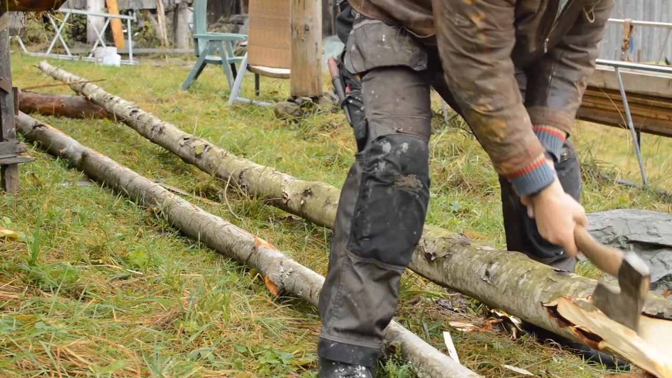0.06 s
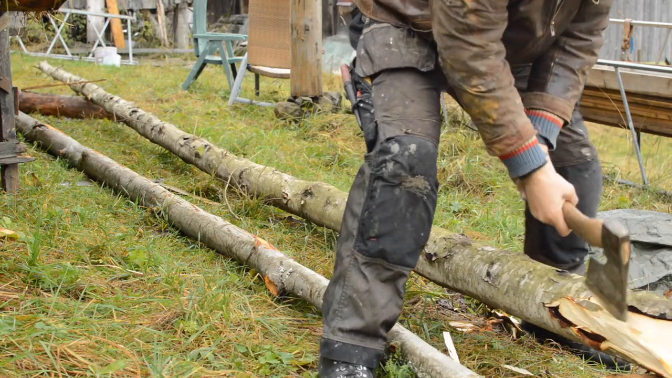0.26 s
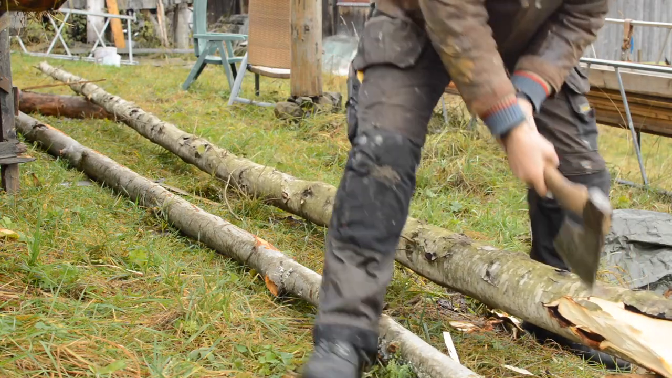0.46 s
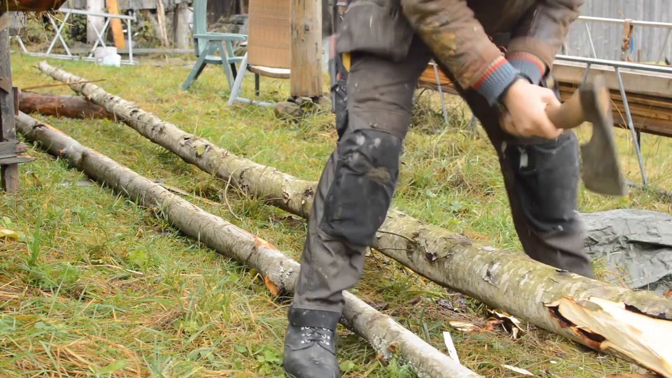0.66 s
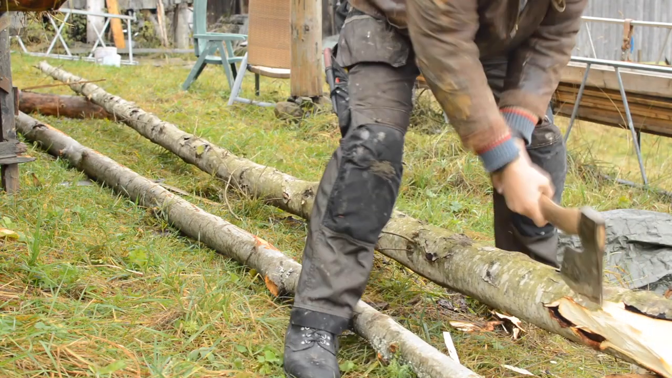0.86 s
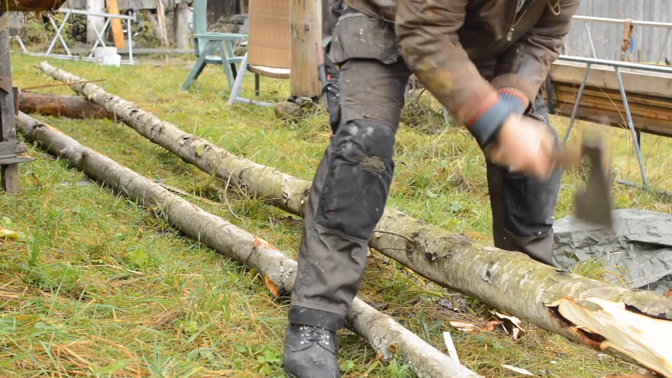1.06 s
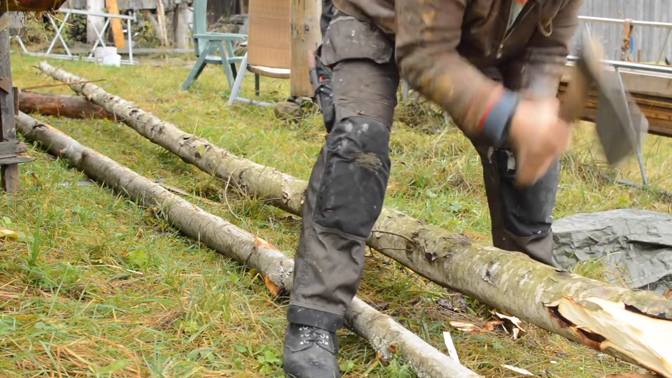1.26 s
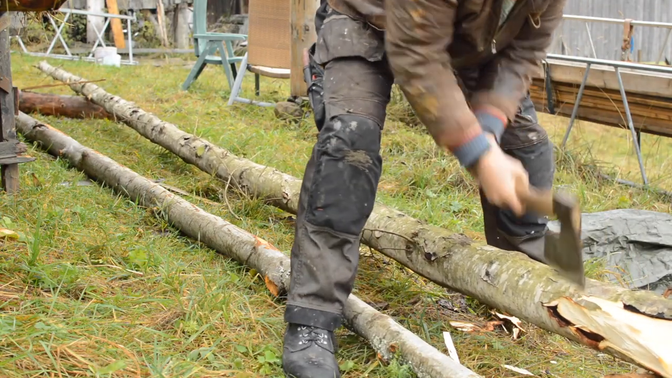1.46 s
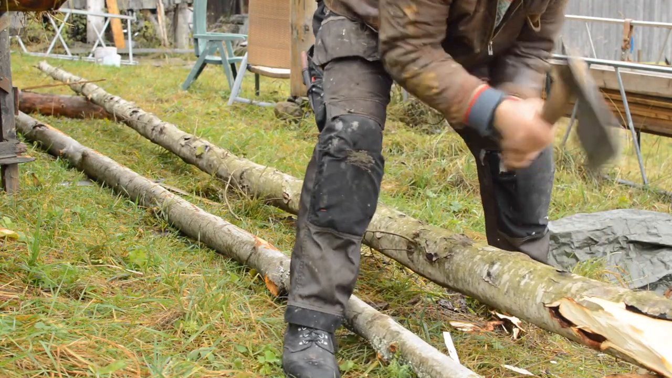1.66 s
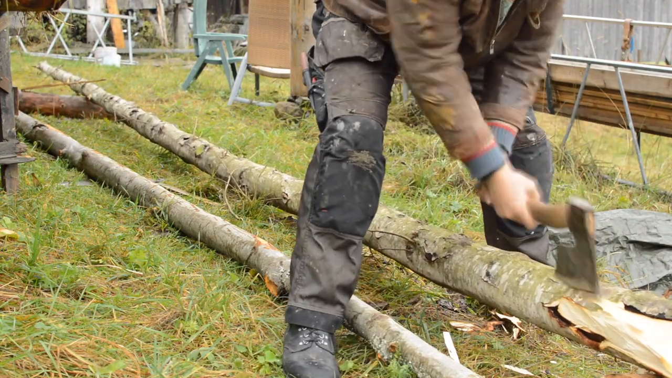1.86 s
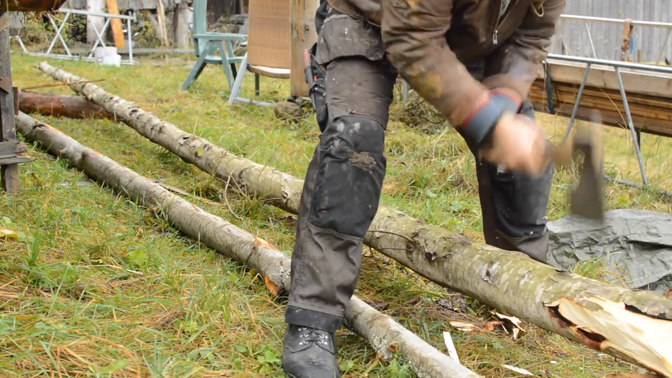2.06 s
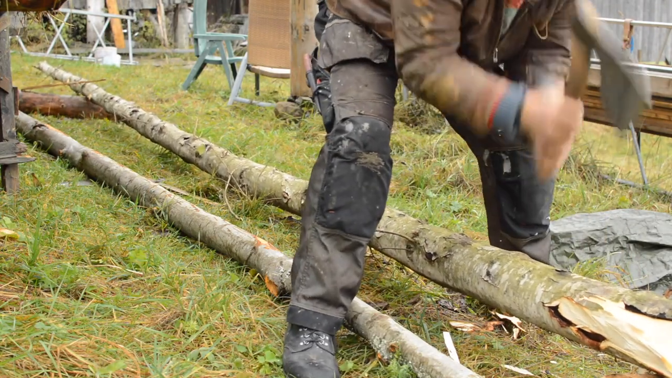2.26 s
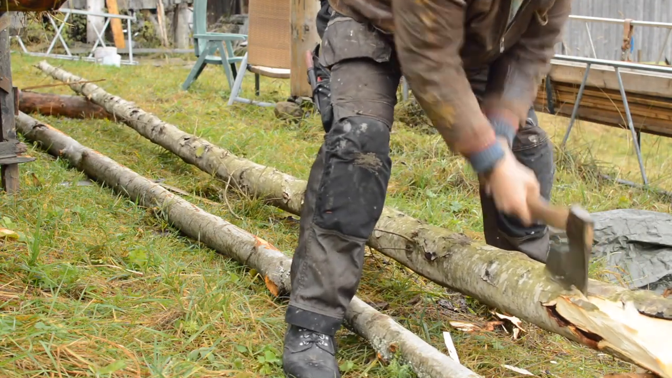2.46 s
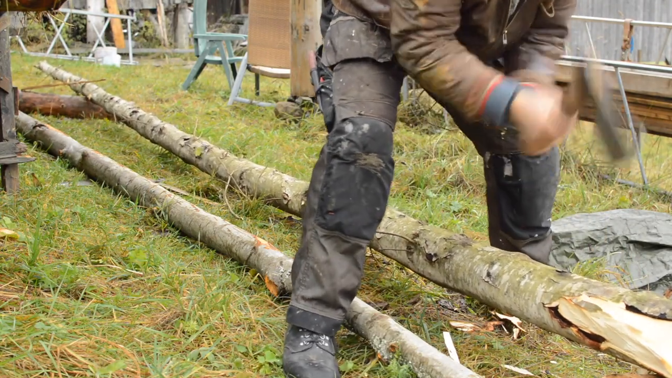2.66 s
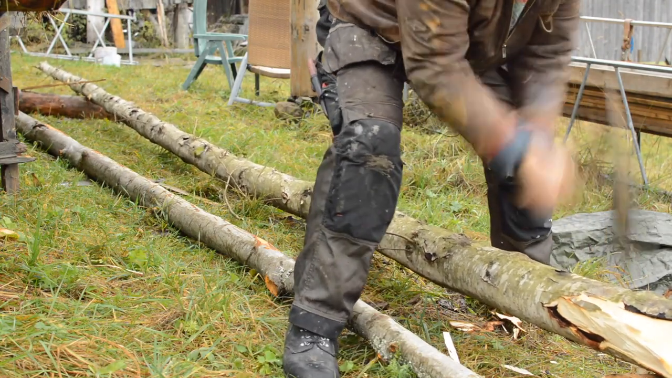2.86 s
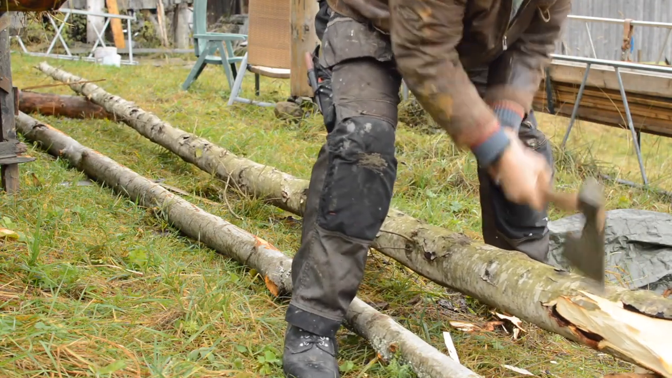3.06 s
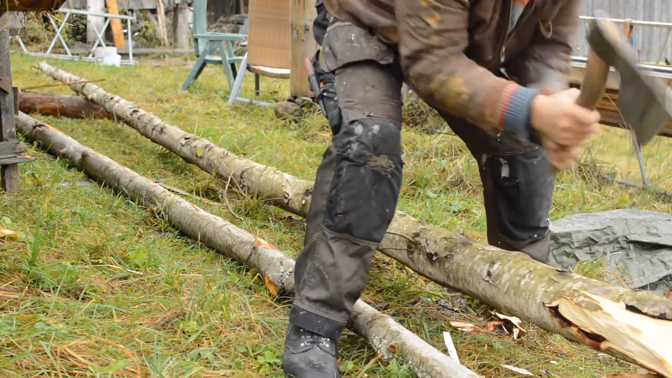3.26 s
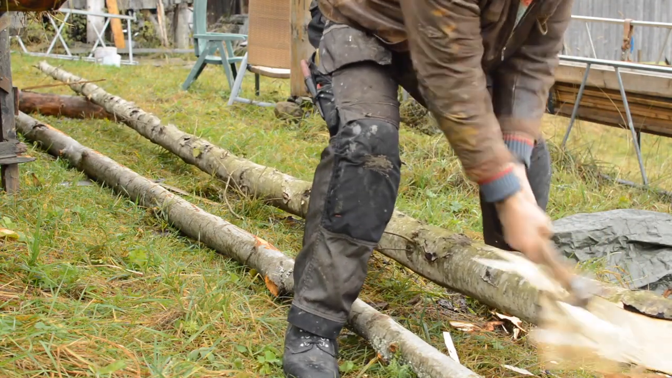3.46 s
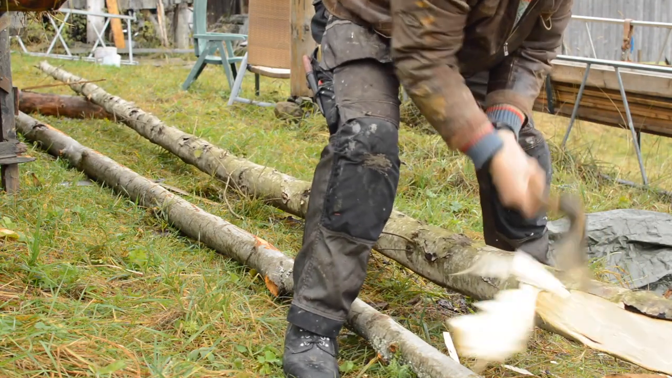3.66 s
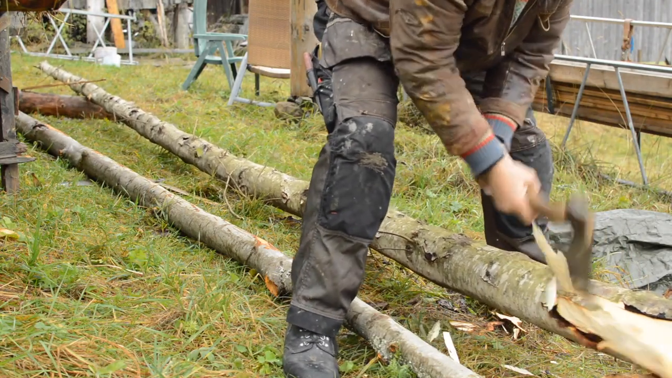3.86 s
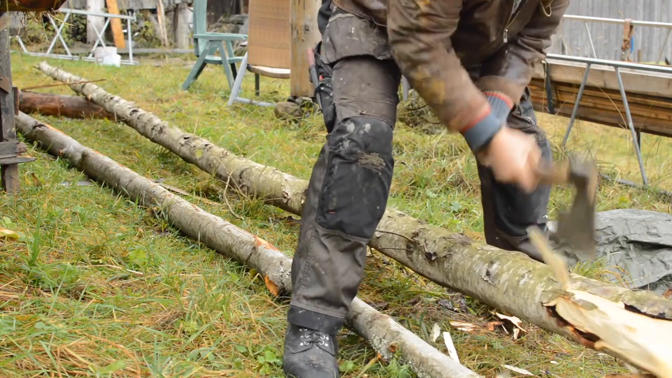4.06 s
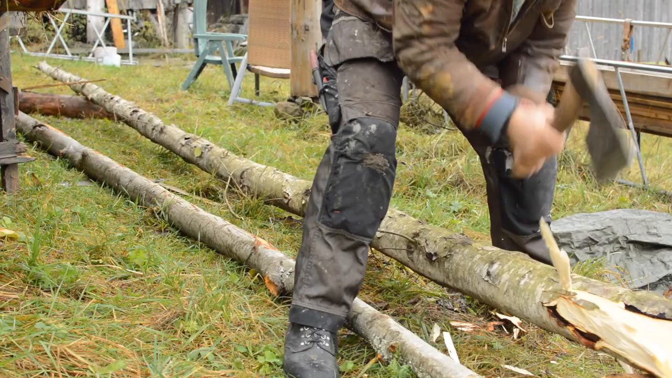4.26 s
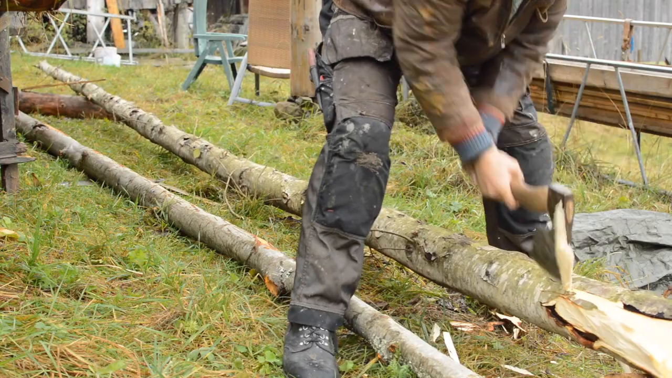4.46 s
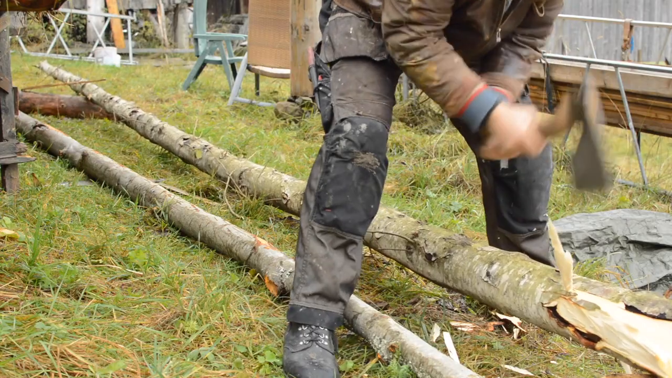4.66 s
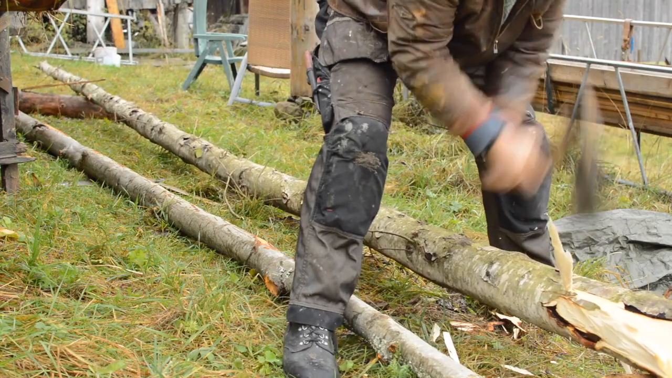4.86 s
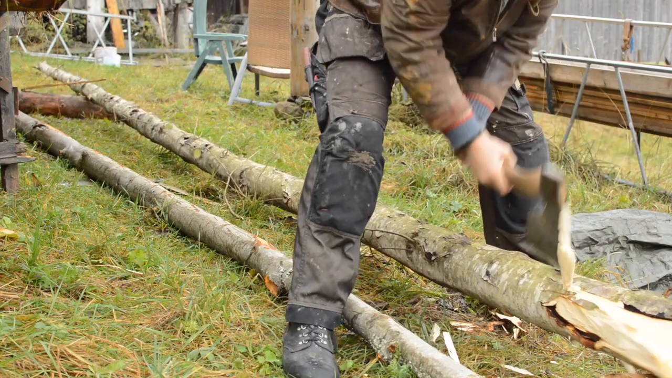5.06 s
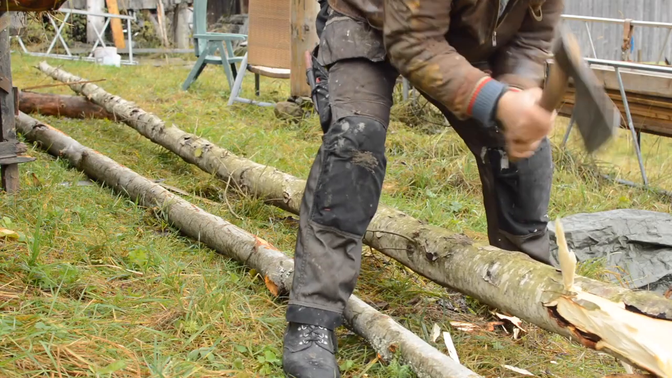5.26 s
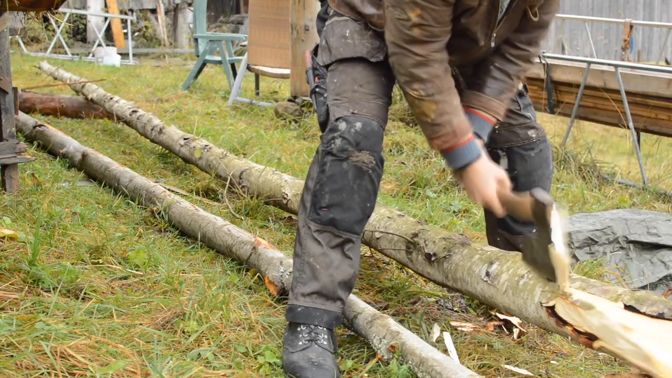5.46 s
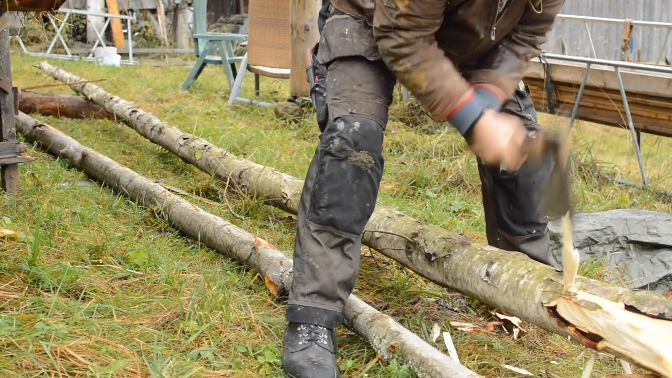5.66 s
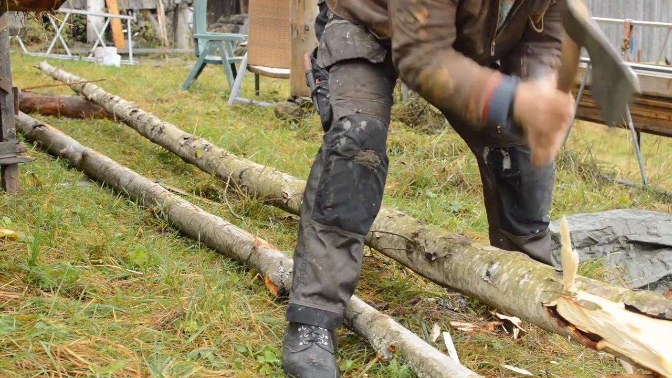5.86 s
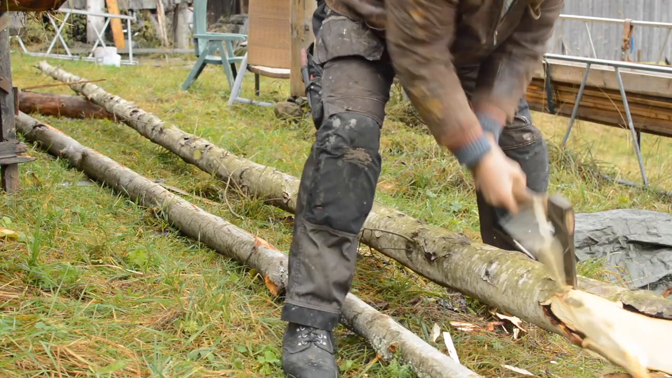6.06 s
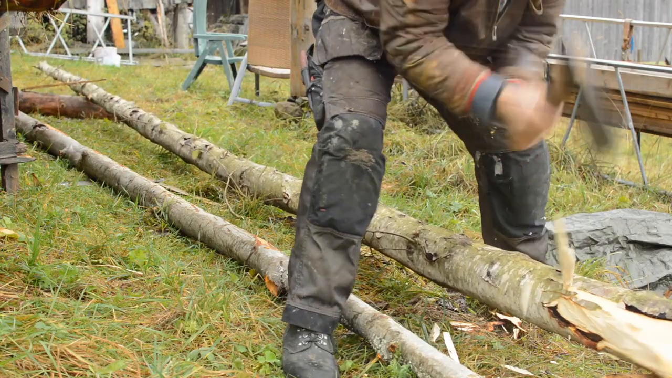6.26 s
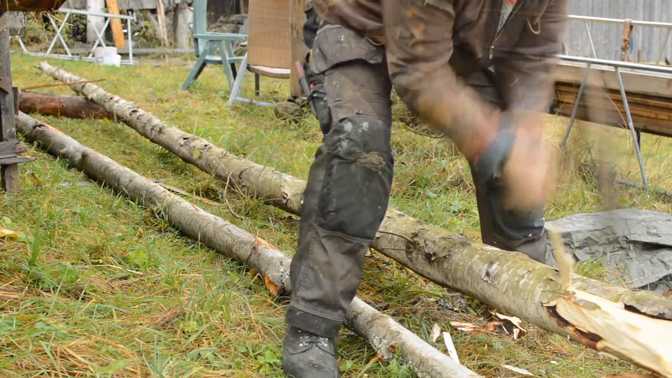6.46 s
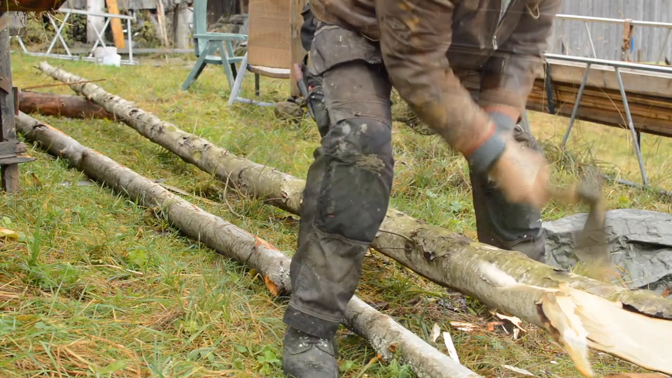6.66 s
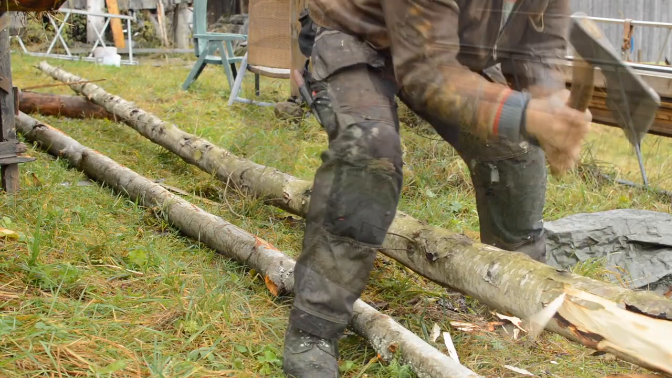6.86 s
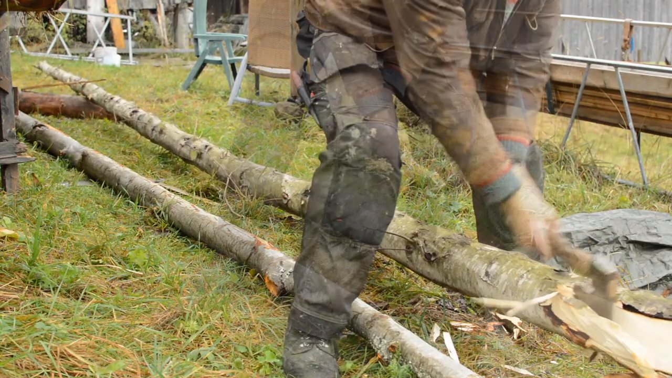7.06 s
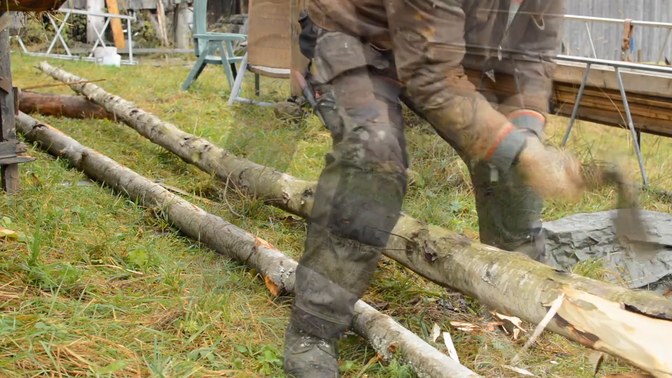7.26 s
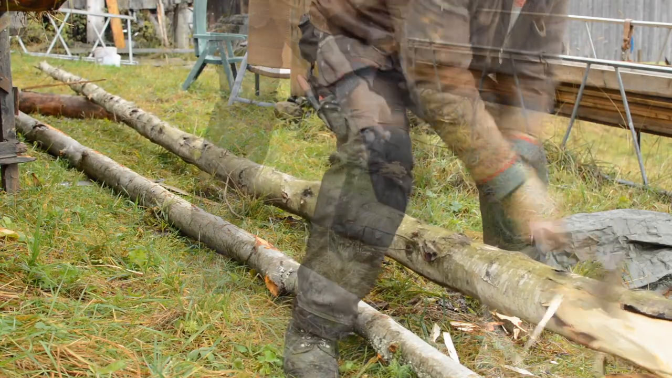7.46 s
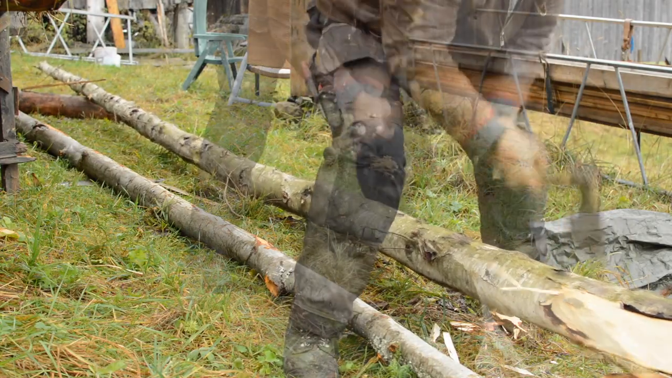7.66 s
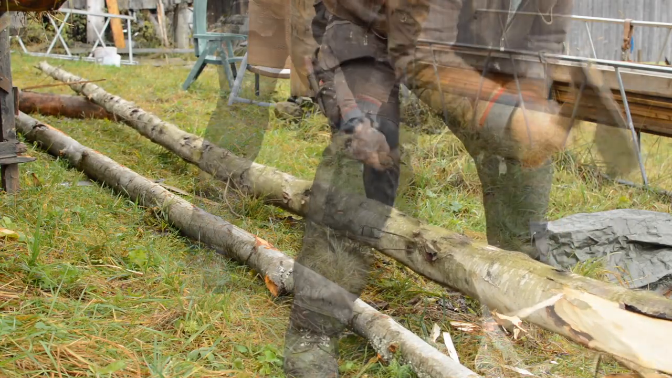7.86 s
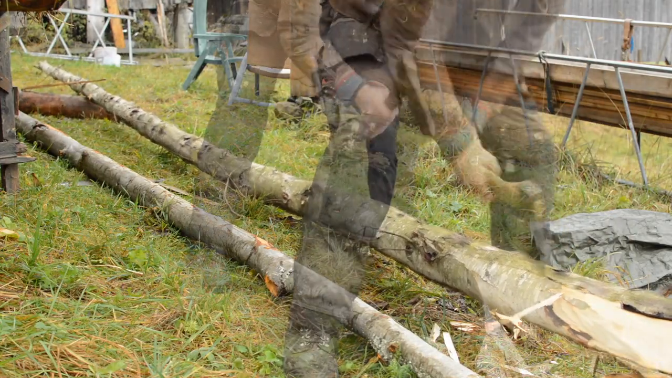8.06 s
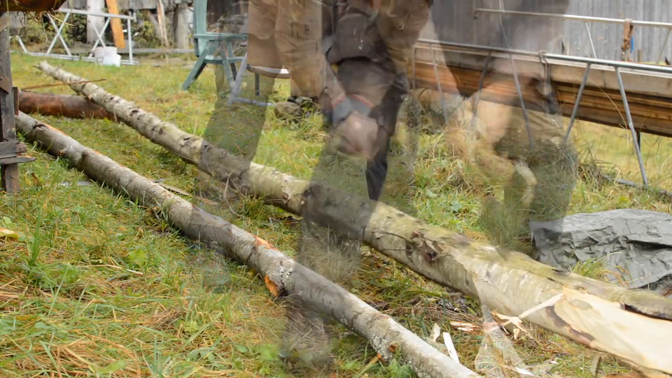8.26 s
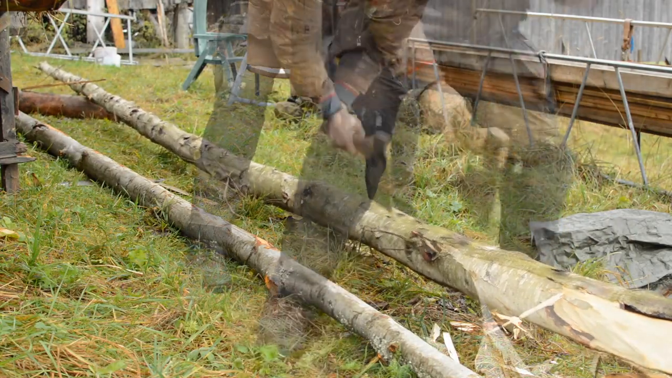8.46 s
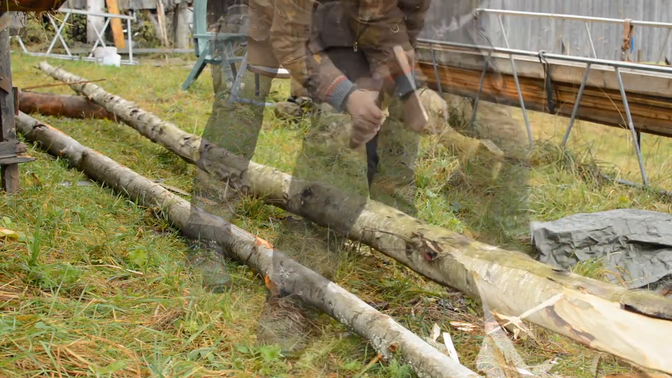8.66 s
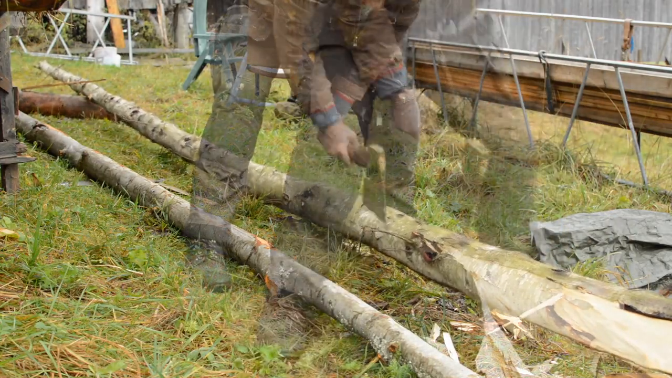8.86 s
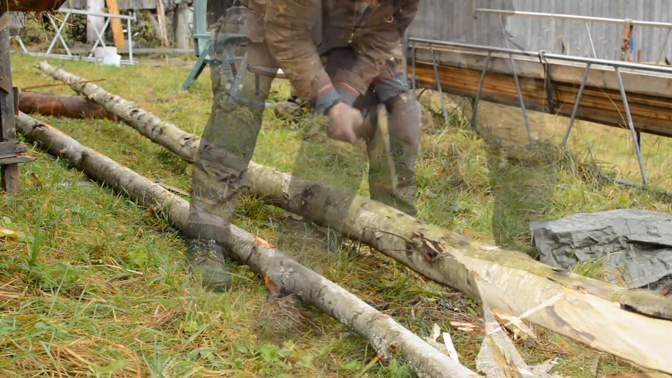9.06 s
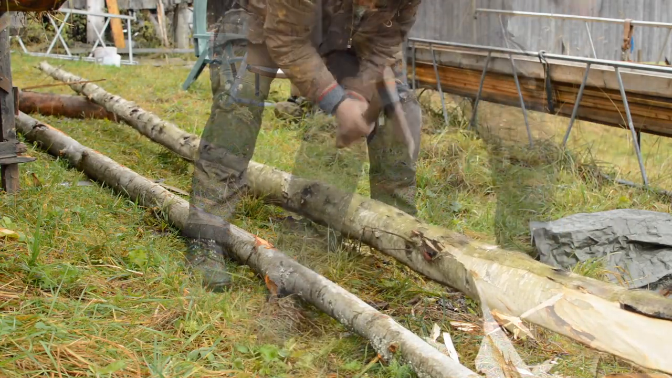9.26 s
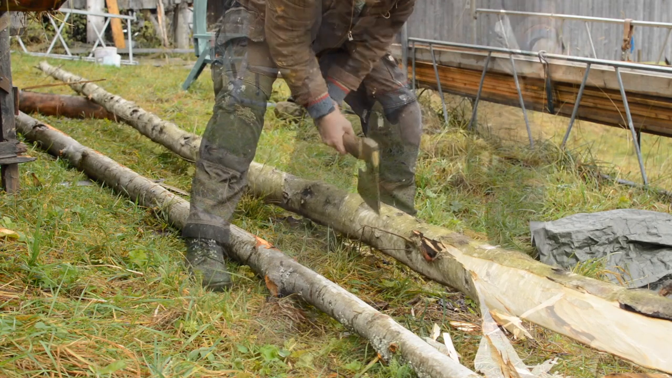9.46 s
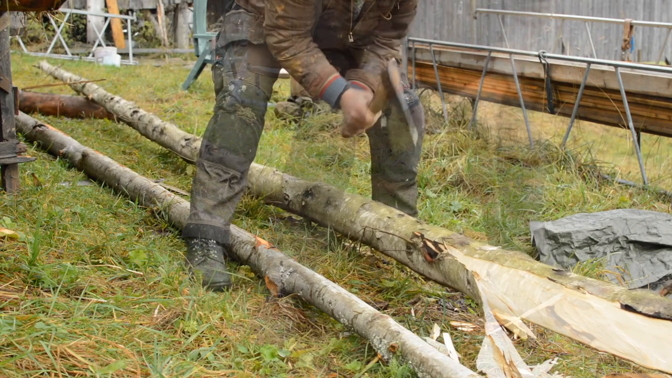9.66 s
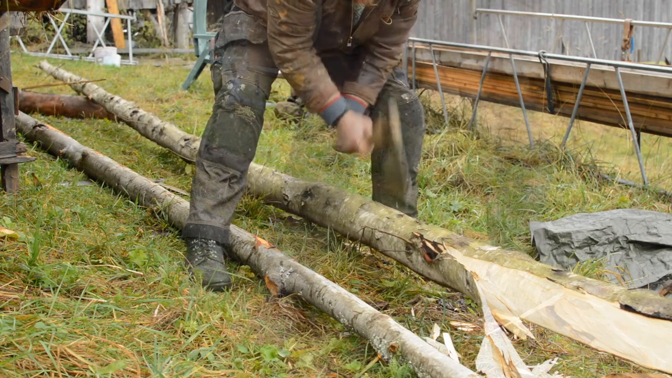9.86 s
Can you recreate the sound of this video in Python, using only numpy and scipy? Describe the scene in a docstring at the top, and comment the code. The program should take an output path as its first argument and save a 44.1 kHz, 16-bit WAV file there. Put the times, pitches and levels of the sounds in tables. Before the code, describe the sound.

An axe hews a log outdoors, steady sharp woody chops about twice a second, with splintering cracks and a faint low engine hum.

```python
"""A yard: an axe hews a round log in front of one microphone, quiet outdoor rush all around.
Each blow tears fibres as uneven noise for some 10-25 ms, then the log's bending modes boom briefly.
Splinters snap, slabs slide and chips land in the grass; now and then the blade pings faintly.
Ground, timber, a fence and far walls answer as decaying noise; in the distance an engine hums,
mains drone and a motor whines, all as wavering sines. The microphone has a soft ceiling."""
import sys
import numpy as np
from scipy import signal
from scipy.fft import rfft, irfft, next_fast_len
from scipy.io import wavfile
from scipy.ndimage import map_coordinates

SR = 44100
rng = np.random.default_rng(int(sys.argv[2]) if len(sys.argv) > 2 else 0)


def inscribe(sig):
    """Save sig as 16-bit PCM at rate SR to the path in sys.argv[1].

    A 1-D sig is mono; a 2-D sig holds one channel per row.
    Samples are clipped to [-1, 1] before scaling.
    """
    pcm = np.round(np.clip(np.atleast_2d(sig).T, -1, 1) * 32767)
    wavfile.write(sys.argv[1], SR, pcm.astype(np.int16))


N = 437472
TIME = np.arange(N) / SR  # time in the whole scene [s]
T = np.arange(SR // 2) / SR  # time inside one event [s]

# Blade in the wood: (time [s], length [s], strength [dB], splintering [dB], grip [dB], boom centre [Hz]).
# Splintering is dry and bright above 0; grip is 0 for a solid cut, far below for a scrape or split.
BLOWS = [(.022, 0.017, -22, -0.5, 0, 294), (.037, .026, -26.5, 1.5, -21, 340),
         (.337, 0.026, -30.5, -3, -19.5, 400), (.377, 0.025, -35.5, -1, -17, 380),
         (.914, .013, -28.5, 2, 2.5, 364), (1.423, .013, -18, -0.5, 3, 413),
         (1.91, .012, -16, -2.5, 2.5, 440), (2.433, 0.021, -13.5, 0.5, -1, 457),
         (2.962, 0.015, -14, -1.5, 0, 560), (3.475, .02, -12.5, -1, -1, 530),
         (3.496, 0.0093, -17, 5.5, -15, 430), (3.902, 0.019, -32.5, -1, -11.5, 340),
         (3.951, .014, -25, 1.5, 2.5, 362), (4.433, 0.015, -19, 0, 0, 428),
         (4.974, 0.016, -18.5, 0.5, 3.5, 338), (5.504, .012, -17.5, -2, 2.5, 360),
         (6.041, .018, -13, -1.5, -2.5, 410), (6.57, .018, -10.5, -1.5, 3.5, 400),
         (7.076, 0.015, -14, -0.5, 1.5, 427), (7.526, 0.018, -29.5, -1, 0, 440),
         (7.545, .014, -24, 0.5, -1, 437), (7.826, 0.016, -39.5, -2, -3, 339),
         (8.041, .013, -23, 3.5, -2, 433), (8.367, 0.019, -30, 2, -2, 393),
         (8.896, .018, -28, -0.5, 0, 397), (9.419, 0.016, -27.5, -1, 1, 371)]
# Spectrum of splinters, chips and grass: (frequency [Hz], level [dB])
CHIP_SPECTRUM = [(200, -18), (1000, -2.5), (2500, 0), (7000, 0.5), (15000, -11.5)]
USUAL_DB = -20  # strength of a usual blow
LEAD = 1 / 10  # share of a bite's length for which the edge first grazes the bark


def amp(db):
    """Decibels to gain."""
    return 10 ** (np.asarray(db) / 20)


def unit(x):
    """Scale to rms 1."""
    return x / np.sqrt(np.mean(x ** 2) + 1e-20)


def along(points, hz):
    """(Hz, value) points read on a log frequency axis."""
    f, v = np.transpose(points)
    return np.interp(np.log(hz + 1), np.log(f + 1), v)


def curves(rows):
    """One value per sample for each column after the time."""
    s, *columns = np.transpose(rows)
    return [np.interp(TIME, s, column) for column in columns]


def wobble(rate):
    """A smooth random curve, rate knots a second."""
    knots = rng.standard_normal(int(N * rate / SR) + 4)
    return map_coordinates(knots, [TIME * rate])


def add(track, s, sound):
    """Mix a sound into the track from s seconds; one due before the start begins at 0."""
    part = track[max(0, round(s * SR)):][:len(sound)]
    part += sound[:len(part)]


def colour(x, points):
    """Causal (minimum-phase) filter with the gain of the (Hz, dB) points."""
    m = 2 * next_fast_len(len(x) // 2 + 2048)
    gain = amp(along(points, np.fft.rfftfreq(m, 1 / SR)))
    cepstrum = irfft(np.log(gain))
    cepstrum[1:m // 2] *= 2  # fold the cepstrum onto positive time
    cepstrum[m // 2 + 1:] = 0
    return irfft(rfft(x, m) * np.exp(rfft(cepstrum)), m)[:len(x)]


def tone(hz):
    """A sine of rms 1 that follows a frequency curve."""
    return np.sqrt(2) * np.sin(2 * np.pi * np.cumsum(hz) / SR)


def background():
    """Coloured noise for the outdoor rush; wavering sines for far engine, mains drone and motor."""
    # Outdoor rush over time: (time [s], level [dB])
    rush_levels = [(0, -52.5), (6.8, -54), (7.6, -55.5), (9.92, -56)]
    # Outdoor rush spectrum: (frequency [Hz], level [dB])
    rush_spectrum = [(20, -11.5), (55, -6), (90, -1.5), (150, -10), (230, -7), (420, -15), (800, -16.5),
                     (1260, -18), (3600, -29), (14300, -33.5), (16000, -35.5)]
    # Far engine hum over time: (time [s], level [dB])
    hum_levels = [(0, -55), (.7, -48), (4.8, -49), (5.6, -53), (7.4, -47.5), (8.3, -57.5), (9.92, -58)]
    # Far motor whine over time: (time [s], frequency [Hz], level [dB])
    whine_course = [(0, 781, -72), (.6, 778, -55), (1.3, 775, -53.5), (2.1, 778, -65), (2.8, 781, -54),
                    (3.4, 783, -67.5), (4.15, 781, -56), (4.45, 803, -72), (4.85, 811, -54.5),
                    (5.3, 808, -69.5), (6.3, 786, -59), (7.6, 809, -55.5), (8.8, 810, -61.5),
                    (9.92, 808, -78)]

    rush_db, = curves(rush_levels)
    rush_gain = amp(rush_db + 2.0 + 1.4 * wobble(2.6))
    rush = rush_gain * unit(colour(rng.standard_normal(N), rush_spectrum))

    hum_db, = curves(hum_levels)
    hum_hz = 94.4 + .7 * wobble(1.2)
    hum_gain = amp(hum_db + 1.0 + 0.97 * wobble(4.1))
    hum = hum_gain * (tone(hum_hz) + amp(-15.0) * tone(2 * hum_hz))

    drone = np.zeros(N)
    for hz, db in [(59.5, -58), (119, -63.0), (232, -64.0)]:
        drone += amp(db + 2.9 * wobble(12)) * tone(hz + .7 * wobble(2.3))

    whine_hz, whine_db = curves(whine_course)
    whine = amp(whine_db + 1.7 * wobble(2.3)) * tone(whine_hz + 0.67 * wobble(12))
    return rush + hum + drone + whine


def fractures(spiky):
    """A dense train of tiny breaks of very unequal size."""
    return rng.standard_normal(len(T)) * np.exp(spiky * rng.standard_normal(len(T)))


def knock(drive, pitch_hz, scatter_db=2):
    """Wood under the edge resonates across the grain, a little differently at every cut."""
    # Cross-grain resonances: (multiple of the knock pitch [ratio], width [Hz], level [dB])
    grain_modes = [(.7, 200, -7), (.87, 230, 0.5), (1.05, 260, 2.5), (1.35, 438, -6)]
    f = np.fft.rfftfreq(len(T), 1 / SR)
    response = 0
    for k, (ratio, width, db) in enumerate(grain_modes):
        gain = (-1) ** k * amp(db + scatter_db * rng.standard_normal())
        damping = 1j * f * width
        response = response + gain * damping / ((ratio * pitch_hz) ** 2 - f * f + damping)
    return colour(irfft(rfft(drive) * response), [(300, -8.5), (900, 8.5), (2200, 0.5), (4500, -19.5)])


def bite(length, knock_db, knock_hz, tear_db, splinter_db, push_db, settle_db=-15, settle_t60=0.091):
    """Fibres break harder as the wedge sinks in; when it sticks, the strained wood crackles out."""
    # Spectra of tearing, fine splintering and the wedge's push: (frequency [Hz], level [dB])
    tear_spectrum = [(900, -42), (1900, -1), (2400, 0), (2700, -3), (3050, -0.5), (3550, -6), (4500, -2),
                     (5500, -11.5), (7500, -22.5)]
    splinter_spectrum = [(3000, -33.5), (5200, -4.5), (6300, 1), (8300, -0.5), (10000, -5.5), (13000, -7),
                         (16000, -12.5)]
    push_spectrum = [(30, -6.5), (140, -9), (230, -1), (450, -0.5), (650, -8.5), (1000, -6), (2000, -38)]

    depth = T / max(length, .002) - LEAD  # 0 = through the bark, 1 = stuck
    force = np.interp(depth, [-LEAD, 0, .17, .45, .88, 1.15], [0.14, 0.17, 0.26, 0.95, 0.9, 0.0012])
    crackle = (depth > 1) * amp(settle_db - 60 * (depth - 1) * length / settle_t60)
    force = np.maximum(force, crackle)
    push_force = np.interp(depth, [0, .15, 1.2], [0, 1, 0])

    def level(x, db):
        """Set the energy to that of an rms of db lasting the bite's length."""
        return amp(db) * x * np.sqrt(length * SR / np.sum(x ** 2))

    wood = level(knock(force * fractures(0.48), knock_hz), knock_db)
    tear = level(colour(force * fractures(0.39), tear_spectrum), tear_db)
    fine = level(colour(force ** 1.24 * fractures(1.0), splinter_spectrum), splinter_db)
    push = level(colour(push_force * fractures(0.31), push_spectrum), push_db)
    return wood + tear + fine + push


def contact(peak_db=-15, t60=0.013):
    """The edge lands with a short clack of fading noise."""
    # Steel meeting wood: (frequency [Hz], level [dB])
    clack_spectrum = [(300, -16.5), (1000, -8), (2200, -4), (2950, 7), (3600, -10), (6000, -13.5),
                      (15000, -15.5)]
    clack = colour(fractures(0.51) * amp(-60 * T / t60), clack_spectrum)
    return amp(peak_db) * clack / np.abs(clack).max()


def boom(centre_hz, scatter_db=3, phase_spread=.7, swell_s=0.017, shudder_db=-13, focus_db=3):
    """Bending waves run to the log's ends and back: modes swell late and throb; the ground shudders."""
    # Bending modes of the log: (frequency [Hz], level [dB], time to fall 60 dB [s])
    log_modes = [(138.2, -13.5, .3), (172, -14, 0.29), (201.6, -4, .18), (231, -9, 0.21), (262, -4, 0.2),
                 (296.8, -1.5, 0.21), (359.4, -5, 0.21), (393.2, -4.5, 0.2), (426.7, -5, 0.24),
                 (493.3, -1, 0.17), (523, -5, .15), (597.4, -1.5, 0.13), (649, -5.5, .16),
                 (713.6, -11.5, 0.2), (847, -9.5, 0.092), (913, -15, 0.11), (1001, -9.5, .15)]
    hz, db, t60 = np.transpose(log_modes)[:, :, None]
    size, phase = rng.standard_normal((2, len(log_modes), 1))
    # the place of the blow favours some modes, a harder stop the higher ones
    favoured = focus_db * np.exp(-2 * np.log2(hz / centre_hz) ** 2)
    hardness = 6 * np.log2(centre_hz / 400) * np.log2(np.maximum(hz, 280) / 400)
    gain = amp(db + favoured + hardness + scatter_db * size - 60 * T / t60)
    modes = gain * np.sin(2 * np.pi * hz * T + phase_spread * phase)

    rise = 1 - np.exp(-T / swell_s)
    shudder_spectrum = [(30, -2.5), (130, -15.5), (300, -3.0), (550, 2.5), (900, -0.5),
                        (1500, -28), (4000, -60.5)]
    shudder = colour(fractures(0.19) * rise * amp(-60 * T / 0.2), shudder_spectrum)
    ringing = unit(modes.sum(0) * rise)
    return amp(-14.0) * unit(ringing + amp(shudder_db) * unit(shudder))


def axe():
    """Every blow lands, bites and booms; a harder one knocks higher, its boom growing less than its bite."""
    # The blade's own note where the wood leaves it free to ring: (time [s], level [dB])
    pings = [(0.388, -49), (1.43, -54), (8.37, -54.5), (8.9, -53.5), (9.425, -51)]
    ping_hz, ping_t60_s = 4160, 0.63
    out = np.zeros(N)
    for s, length, strength_db, dry_db, grip_db, boom_hz in BLOWS:
        extra_db = strength_db - USUAL_DB
        boom_db = -23 + 0.42 * extra_db + grip_db
        knock_hz = 1500 * 2 ** (.003 * extra_db)
        solid = min(1, amp(boom_db + 27.5))  # a scrape that hardly moves the log makes little clack
        add(out, s - LEAD * length, bite(length, knock_db=strength_db - 1.08 - dry_db, knock_hz=knock_hz,
                                         tear_db=strength_db - 0.5,
                                         splinter_db=strength_db - 1.7 + dry_db, push_db=boom_db - 4.0))
        add(out, s + .001, solid * contact())
        add(out, s + 0.00802, amp(boom_db) * boom(boom_hz))
    for s, db in pings:
        add(out, s, amp(db - 60 * T / ping_t60_s) * np.sin(2 * np.pi * ping_hz * T))
    return out


def yard(x, near_db=-15, fence_db=-34, far_db=-35, far_t60=0.87):
    """Ground and timber scatter a short tail, new for each blow; a fence echoes, far walls linger."""
    # Decay of the near tail: (frequency [Hz], time to fall 60 dB [s])
    near_decay = [(200, 0.087), (1200, 0.13), (3000, .14), (7000, 0.13), (14000, 0.085)]
    # Colour of all that comes back: (frequency [Hz], level [dB])
    answer_colour = [(200, -6), (900, 1), (2500, 0), (7000, -1.5), (14000, 1)]
    out = np.zeros(N)
    starts = [0] + [row[0] - .005 for row in BLOWS[1:]] + [N / SR]
    echo = np.exp(-np.abs(T - .068) / .003)  # the fence answers around 68 ms
    for start, end in zip(starts, starts[1:]):
        hz, t, z = signal.stft(rng.standard_normal(len(T)), SR, nperseg=128)
        fading = z * amp(-60 * t / along(near_decay, hz)[:, None])
        near = signal.istft(fading, SR, nperseg=128)[1][:len(T)]
        near = unit(near * (1 - np.exp(-T / 0.00088)))
        fence = unit(rng.standard_normal(len(T)) * echo)
        far = unit(rng.standard_normal(len(T)) * amp(-60 * T / far_t60))
        tail = (amp(near_db) * near + amp(fence_db) * fence + amp(far_db) * far) / np.sqrt(len(T))
        piece = x[round(start * SR):round(end * SR)]
        add(out, start, signal.fftconvolve(piece, tail))
    return colour(out, answer_colour)


def snap():
    """One dry snap of peak 1: a fast and a slower decay of breaks, with its own colour."""
    tint = [(hz, level + 2 * rng.standard_normal()) for hz, level in CHIP_SPECTRUM]
    decay = amp(-60 * T / 0.0025) + 0.058 * amp(-60 * T / 0.015)
    crack = colour(fractures(0.94) * decay, tint)
    return crack / np.abs(crack).max()


def rustle(width, tilt):
    """A soft swell of many small breaks, centred in the event; tilt in dB per octave."""
    tilted = [(hz, level + tilt * np.log2(hz)) for hz, level in CHIP_SPECTRUM]
    grains = unit(colour(fractures(0.65), tilted))
    return grains * np.exp(-.5 * ((T - T.mean()) / width) ** 2)


def chips():
    """Noise bursts for dry snaps, fading sines for clinks, soft noise swells for rustles."""
    # The loudest splinters snapping and chips landing: (time [s], level [dB])
    snaps = [(0.051, 3), (0.0654, -6), (0.1029, -20.5), (0.3524, -26), (0.4019, -10.5), (0.4394, -33),
             (0.528, -25), (0.702, -31), (0.7595, -28.5), (2.4537, -7), (3.512, 5), (3.6039, -15),
             (3.6247, -20.5), (5.0582, -20), (6.9298, -24.5), (7.5522, -8)]
    # Loose chips clinking on the log: (time [s], frequency [Hz], level [dB])
    clinks = [(2.591, 1380, -38), (7.604, 2260, -33), (8.129, 1795, -43), (8.128, 2800, -44),
              (8.13, 4470, -45), (8.191, 2670, -46.5)]
    # Slabs sliding through grass, blade scraping, feet shifting:
    # (centre time [s], half width [s], level [dB], brightness [dB per octave])
    rustles = [(0.357, 0.016, -36, -4), (0.632, 0.056, -48.5, 0), (3.108, 0.0088, -44, -3.5),
               (3.56, 0.036, -46.5, 6), (3.71, 0.0063, -45, -5), (6.134, 0.011, -38.5, -2),
               (6.741, 0.0081, -32.5, -4.5), (6.865, 0.015, -48, -3), (8.49, 0.025, -50.5, 2)]
    out = np.zeros(N)
    for s, db in snaps:
        add(out, s, amp(db + 1.0) * snap())
    for s, hz, db in clinks:
        # the chip skids as it rings, which roughens the note
        skitter = np.cumsum(0.046 * rng.standard_normal(len(T)))
        add(out, s, amp(db - 60 * T / 0.04) * np.sin(2 * np.pi * hz * T + skitter))
    for s, width, db, tilt in rustles:
        add(out, s - T.mean(), amp(db) * rustle(width, tilt))
    return out


def around_blows(count=3):
    """Soft noise swells: the sleeve swishes with each swing, crumbs of wood patter into the grass."""
    swing_lead_s, swing_width_s, swing_db = 0.16, 0.032, -48.5  # level over the strength
    shortest_flight_s, extra_flight_s = 0.054, 0.15
    out = np.zeros(N)
    # swells centred before T.mean() fall there instead: add() starts them at 0
    for s, _, strength_db, *_ in BLOWS:
        swish = rustle(swing_width_s, tilt=-1.5)
        add(out, s - swing_lead_s - T.mean(), amp(strength_db + swing_db) * swish)
        for _ in range(count):
            db = -55.5 + .7 * (strength_db - USUAL_DB) + 3 * rng.standard_normal()
            landing = s + shortest_flight_s + extra_flight_s * rng.random()
            crumb = rustle(0.0036, tilt=-2.5)  # the grass softens each landing
            add(out, landing - T.mean(), amp(db) * crumb)
    return out


def scene():
    """The work and its surroundings, alike in both channels."""
    work = axe() + chips() + around_blows()
    return np.tile(work + yard(work) + background(), (2, 1))


def record(dry, ceiling=.85, top_hz=15900):
    """The microphone's soft ceiling rounds off the loudest bites, then the band is limited."""
    rounded = dry / (1 + np.abs(dry / ceiling) ** 4) ** (1 / 4)
    m = next_fast_len(N + SR // 2)
    low_pass = 1 / (1 + (np.fft.rfftfreq(m, 1 / SR) / top_hz) ** 120)
    return irfft(rfft(rounded, m) * low_pass, m)[:, :N]


dry = scene()
out = record(dry)
inscribe(out)
```